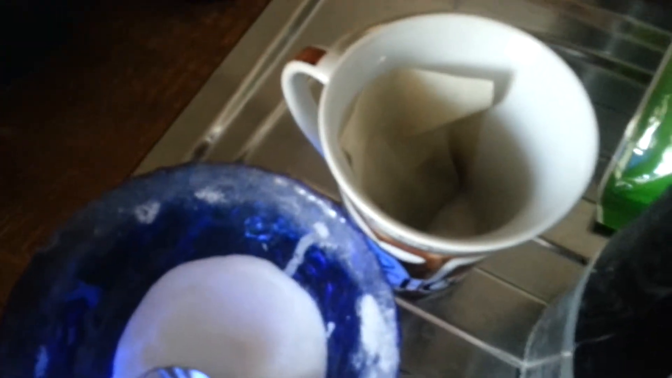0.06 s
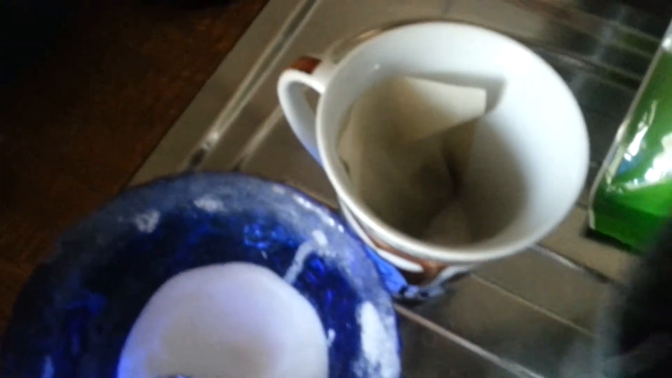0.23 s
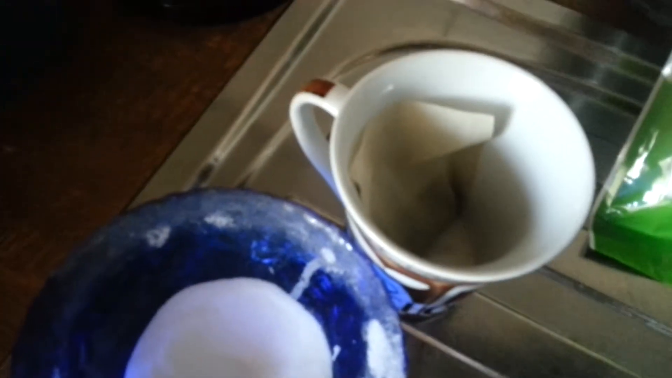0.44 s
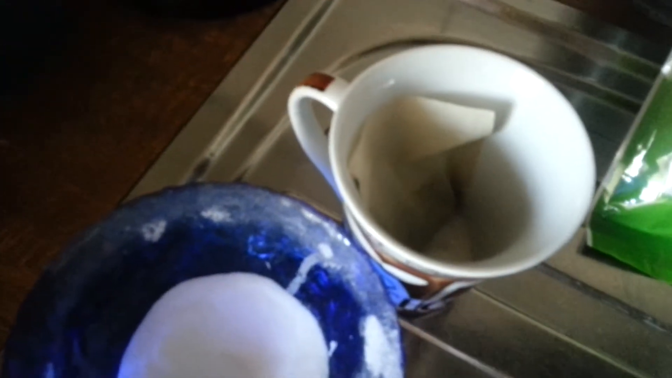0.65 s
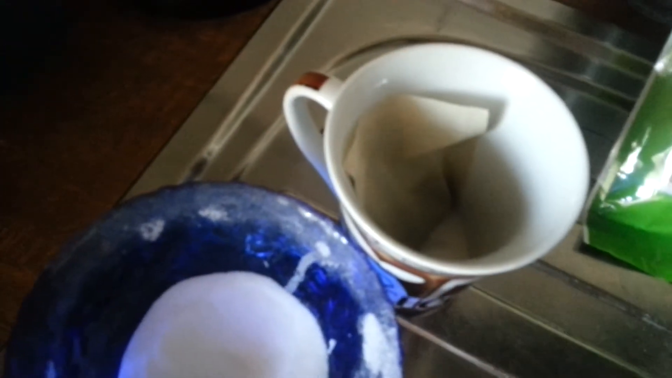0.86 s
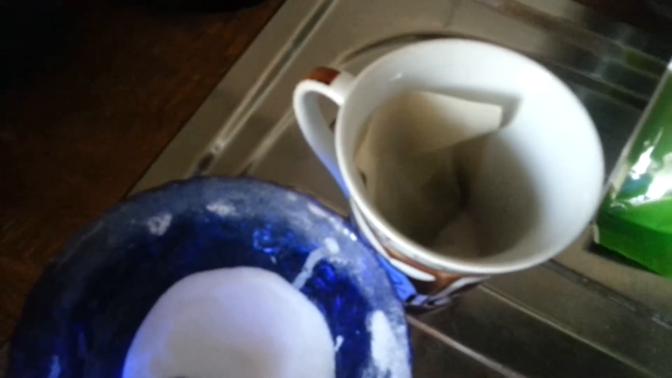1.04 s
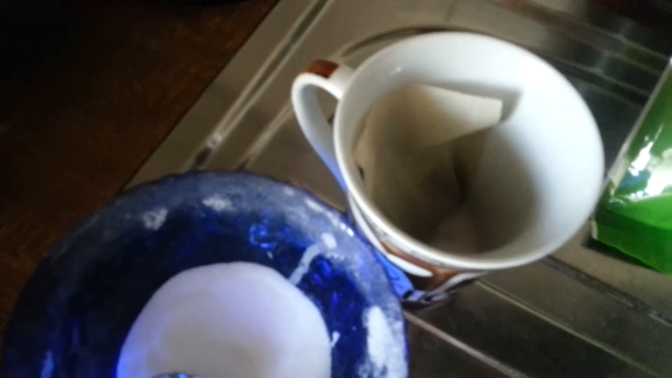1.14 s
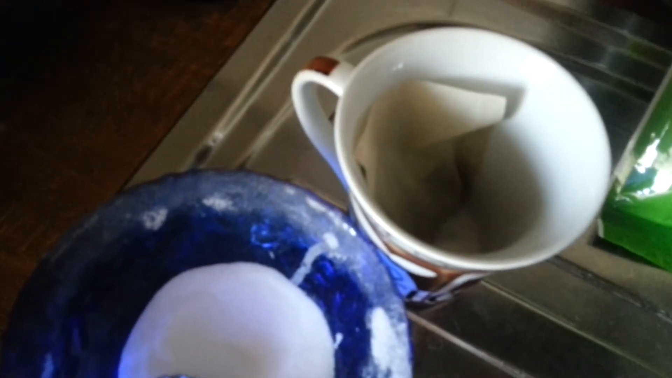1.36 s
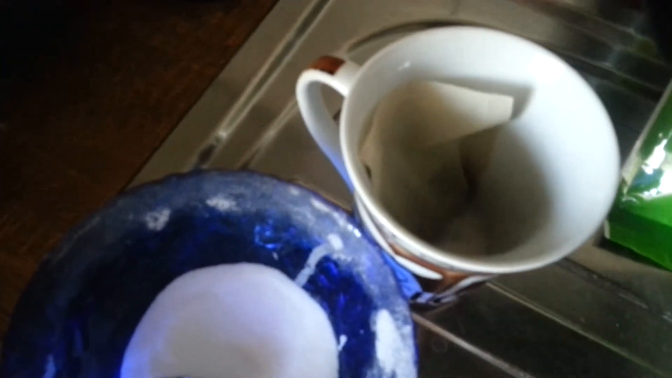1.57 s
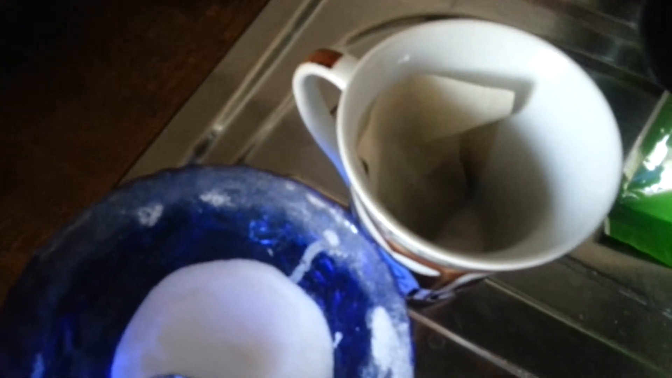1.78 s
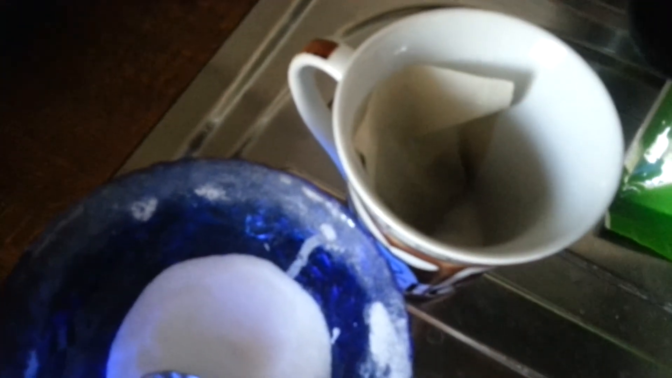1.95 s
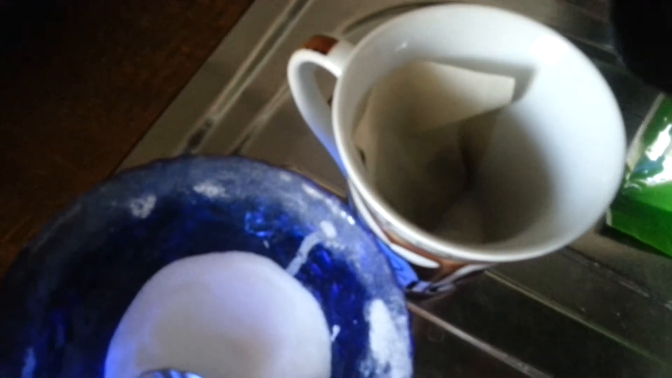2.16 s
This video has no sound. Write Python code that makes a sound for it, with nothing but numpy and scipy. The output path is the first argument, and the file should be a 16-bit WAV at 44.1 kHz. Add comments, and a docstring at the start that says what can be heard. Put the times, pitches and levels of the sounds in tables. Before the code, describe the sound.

Light plastic ticks and rubbing, then a loud hollow knock as a hot kettle lands on its base, a small after-knock, and muffled bubbling dying away; heard close in a small, quiet kitchen.

```python
"""A hollow clunk and a plastic scrape, over a rush of water that thins out to single dull pops.
An electric kettle, just off the boil, is set down: knocks ring damped body modes and crack as noise,
the scrape and the rush are coloured random clicks, and collapsing steam pops as short rings and noise.
A small kitchen and faint hiss surround it, heard from close by with a pair of microphones."""
import sys
import numpy as np
from scipy import signal
from scipy.fft import rfft, irfft
from scipy.io import wavfile

SR = 44100
rng = np.random.default_rng(int(sys.argv[2]) if len(sys.argv) > 2 else 0)


def master(y):
    """Save y as 16-bit WAV."""
    cut = np.clip(np.atleast_2d(y).T, -1, 1)
    pcm = np.round(cut * 32767)  # scale
    wavfile.write(sys.argv[1], SR, pcm.astype(np.int16))


N = 97020

# delay at the right microphone: longer for rush and pops, shorter for cracks, scrapes and singing
LONG_LAG_S, SHORT_LAG_S = 0.000377, 0.00021
WATER_PAN_DB = -3  # rush and pops


def undb(db):
    """Decibels to gain."""
    return 10 ** (np.asarray(db) / 20)


def unit(x):
    """Scale to rms 1."""
    return x / np.sqrt(np.mean(x ** 2))


def clock():
    """Time of every sample [s]."""
    return np.arange(N) / SR


def noise():
    """Two independent streams of white noise."""
    return rng.standard_normal((2, N))


def curve(rows):
    """Gain along (time [s], level [dB]) points."""
    return undb(np.interp(clock(), *np.array(rows).T))


def fade(start_s, life_s):
    """Sudden onset with an exponential decay."""
    age_s = clock() - start_s
    return (age_s >= 0) * np.exp(-np.abs(age_s) / life_s)


def ring(hz, life_s, start_s=0):
    """A damped sine."""
    return fade(start_s, life_s) * np.sin(2 * np.pi * hz * (clock() - start_s))


def convolve(x, response):
    """Pass a sound through an impulse response."""
    return signal.fftconvolve(np.atleast_2d(x), np.atleast_2d(response), axes=1)[:, :N]


def colour(x, points, size=4096):
    """Minimum-phase filter of unit power through (frequency [Hz], level [dB]) points."""
    hz, db = np.array(points).T
    grid_hz = np.maximum(np.arange(size // 2 + 1) * SR / size, 1)
    gain = undb(np.interp(np.log(grid_hz), np.log(hz), db))
    # folding the cepstrum forward makes the filter causal
    cepstrum = irfft(np.log(gain))
    cepstrum[1:size // 2] *= 2
    cepstrum[size // 2 + 1:] = 0
    response = irfft(np.exp(rfft(cepstrum)))
    return convolve(x, response / np.linalg.norm(response))


def clicks(per_s, spread_db):
    """Two streams of random clicks of uneven size, with mean power near 1."""
    chance = np.clip(per_s / SR, 1e-6, 1)
    excess = np.minimum(rng.exponential(size=(2, N)), np.pi)
    size = unit(undb(spread_db * excess))
    happens = rng.random((2, N)) < chance
    sign = rng.choice([-1, 1], (2, N))
    return happens * sign * size / np.sqrt(chance)


def pan(db):
    """Left and right gains for a level difference; positive is louder on the left."""
    return undb(np.array([[.5], [-.5]]) * db)


def place(x, pan_db, lag_s):
    """The sound reaches the left microphone first; towards the treble the two hear less alike."""
    likeness, spread_hz = 0.56, 300  # likeness the treble tends to
    hz = np.arange(N // 2 + 1) * SR / N
    shared = 1 - (1 - likeness) * hz ** 2 / (hz ** 2 + spread_hz ** 2)
    common = shared * rfft(x[0]) * np.exp(-2j * np.pi * hz * lag_s)
    separate = np.sqrt(1 - shared ** 2) * rfft(x[1])
    return np.array([x[0], irfft(common + separate, N)]) * pan(pan_db)


def place_tone(x, pan_db, lag_s):
    """The same tone at both microphones, later at the right one."""
    right = np.interp(clock() - lag_s, clock(), x)
    return np.array([x, right]) * pan(pan_db)


def low_cut(x):
    """The small kettle radiates almost no deep bass."""
    return signal.sosfilt(signal.butter(4, 148, "high", fs=SR, output="sos"), x)


def background():
    """Steady room noise, and a fine hiss that swells briefly and then sinks as the water settles."""
    # colour of the room noise (frequency [Hz], level [dB per Hz])
    floor_colour = [(18, -32), (30, -8), (87, 1.5), (165, -1.5), (722, -6.5), (1010, -11), (1120, -5.5),
                    (1310, -6), (1930, -10.5), (4770, -14), (6180, -20), (11200, -16), (14500, -18.5)]
    # treble hiss (time [s], level [dB])
    hiss_level = [(0, -61), (.3, -57.5), (.7, -59.5), (1.0, -61), (1.4, -65.5), (2.2, -68.5)]
    # its colour (frequency [Hz], level [dB per Hz])
    hiss_colour = [(1000, -15), (4000, -7), (7500, -0.5), (14000, -2)]
    floor_db, floor_pan_db = -58, -2
    room = colour(noise(), floor_colour) * undb(floor_db) * pan(floor_pan_db)
    return room + curve(hiss_level) * colour(noise(), hiss_colour)


def boil():
    """Collapsing steam bubbles, rarer and softer as the boil weakens, and resonances singing as noise bands."""
    # strength of the boil (time [s], level [dB])
    boil_level = [(0, -51), (.3, -45.5), (.41, -46), (.47, -47.5), (.55, -52), (.58, -46), (.71, -48.5),
                  (.76, -52), (.92, -52.5), (1.05, -55.5), (1.3, -63), (1.47, -55.5), (1.6, -66.5),
                  (1.82, -67.5), (1.92, -56.5), (2.0, -71), (2.08, -60), (2.2, -74)]
    # bubbles heard through the kettle wall (frequency [Hz], level [dB])
    wall_colour = [(50, -46), (100, -29), (170, -5), (350, 5.5), (520, -6), (760, 9), (1150, 7.5),
                   (1450, 4.5), (1670, 8.5), (2000, -4), (2650, -1), (3400, -5.5), (4200, 0.5),
                   (5500, -26.5), (14000, -37.5)]
    # singing resonances (frequency [Hz], width [Hz], level at start [dB], start [s], end [s])
    singing = [(910.3, 32, -45.5, 0.33, 0.733), (860, 90, -62, 0.42, 0.51), (1010, 58, -50.5, 0.41, 0.48),
               (368, 21, -53.5, 0.2, 0.69), (4170, 210, -61, 0.677, 0.696), (184.4, 19, -63, .55, 1.17),
               (764, 120, -58.5, 0.907, 1.03)]
    peak_bubbles_per_s, spread_db, rate_db_per_decade, rush_db = 2900, 1.5, 25.5, -2
    sing_fade_s, sing_sag_db_per_s, sing_pan_db = 0.023, -21.5, 2.5

    t, strength = clock(), curve(boil_level)
    per_s = peak_bubbles_per_s * (strength / strength.max()) ** (20 / rate_db_per_decade)
    rush = colour(undb(rush_db) * strength * clicks(per_s, spread_db), wall_colour)
    song = 0
    for hz, width_hz, db, start_s, end_s in singing:
        outside_s = np.maximum(np.maximum(start_s - t, t - end_s), 0)
        level = undb(db + sing_sag_db_per_s * (t - start_s))
        swell = np.exp(-outside_s / sing_fade_s) * level
        tone = convolve(rng.standard_normal(N), ring(hz, 1 / (np.pi * width_hz)))[0]
        song = song + swell * unit(tone)
    return place(rush, WATER_PAN_DB, LONG_LAG_S) + place_tone(song, sing_pan_db, SHORT_LAG_S)


def sliding():
    """The foot sticks and slips over the base: a low rub and swelling scrapes, both of random clicks."""
    # low rub of the foot (time [s], level [dB])
    rub_level = [(0, -42), (.05, -44), (.08, -48), (.105, -44), (.117, -38), (.135, -53), (.165, -36.5),
                 (.245, -38.5), (.29, -53), (.34, -64), (.45, -74.5)]
    # its colour (frequency [Hz], level [dB])
    rub_colour = [(50, -54), (150, -42), (195, -1), (230, -3), (350, 5), (520, -7.5), (680, -7.5),
                  (930, -5), (1300, -25), (4000, -34.5)]
    # scrapes (peak time [s], level [dB], rise [s], fall [s])
    scrapes = [(0.016, -37, 0.015, 0.017), (0.167, -51, 0.045, 0.046), (0.224, -45, 0.042, 0.027),
               (0.292, -30.5, 0.027, 0.018), (.365, -53, 0.0074, 0.023)]
    # scraping plastic (frequency [Hz], level [dB])
    scrape_colour = [(50, -69), (130, -8.5), (350, -1.5), (700, 0.5), (1150, 0.5), (1550, 8.5), (2100, 4),
                     (3000, -0.5), (4500, -9.5), (6200, -18.5), (14000, -26)]

    t, force = clock(), 0
    for peak_s, db, rise_s, fall_s in scrapes:
        force = force + undb(db) * np.exp(-np.maximum((peak_s - t) / rise_s, (t - peak_s) / fall_s))
    scrape = colour(force * clicks(per_s=1600, spread_db=2.5), scrape_colour)
    rub = colour(curve(rub_level) * clicks(per_s=1500, spread_db=0), rub_colour)
    return place(scrape, -4.5, SHORT_LAG_S) + place(rub, 3.5, SHORT_LAG_S)


def set_down():
    """Each knock rings the damped modes of the kettle's body and gives a short plastic crack."""
    # knocks of the kettle on its base (time [s], body level [dB], crack level [dB])
    knocks = [(0.0105, -69, -54), (0.0236, -57.5, -51), (0.0477, -50.5, -39), (0.09, -66, -39),
              (.111, -46, -36.5), (0.17, -64.5, -32.5), (.175, -20, -29), (.1793, -22.5, -15.5),
              (0.1823, -22, -25.5), (.188, -27, -21), (.1966, -35, -26), (0.2145, -54, -19),
              (0.287, -38, -29), (0.2954, -47, -28)]
    # modes of the filled kettle on its base (frequency [Hz], level [dB], t60 [s])
    body_modes = [(133.4, -24.5, 0.47), (236.4, -21.5, 0.19), (377, -49, .2), (448.3, -7.5, .12),
                  (545, -10, 0.11), (697, 3, 0.075), (757, -19, 0.044), (902, -11.5, 0.077),
                  (1140, -18, 0.24), (1360, -24, 0.15), (1370, -15, 0.1), (1574, -10, 0.3),
                  (1730, -30, .14), (1923, -18, 0.24), (2610, -32, .14)]
    # contact crack (frequency [Hz], level [dB])
    crack_colour = [(50, -105), (110, -46), (250, -13), (600, 8.5), (1000, -0.5), (1600, 4.5), (2700, -1),
                    (3600, -9), (5000, -23), (6200, -28), (14000, -45)]
    crack_s, contact_s = 0.006, 0.0001  # decay constants
    body_pan_db_per_octave, crack_pan_db = -1, -3.5

    push = sum(undb(db) * fade(s, contact_s) for s, db, _ in knocks) / (contact_s * SR)
    response = 0
    for hz, db, t60_s in body_modes:
        octaves = max(np.log2(hz / 350), 0)  # the bass stays central
        gains = undb(db) * pan(body_pan_db_per_octave * octaves)
        response = response + gains * ring(hz, t60_s / np.log(1000))
    body = low_cut(convolve(push, response))
    contact = sum(undb(db) * fade(s, crack_s) for s, _, db in knocks)
    crack = colour(contact * noise(), crack_colour)
    return body + place(crack, crack_pan_db, SHORT_LAG_S)


def pops():
    """A large bubble rings for a few cycles and shakes the kettle wall, heard as a noise burst."""
    # single steam pops (time [s], relative level [dB], pitch [Hz])
    steam_pops = [(.443, -37, 920), (.456, -31.5, 413), (.497, -36, 1760), (.53, -38.5, 2390),
                  (.537, -40, 908), (0.5606, -33, 900), (.569, -39, 2170), (.579, -38.5, 820),
                  (.718, -36.5, 1640), (.804, -45.5, 2580), (.833, -42, 1700), (.865, -45, 820),
                  (.883, -49, 1610), (.899, -40.5, 790), (.909, -55, 726), (.937, -39.5, 1500),
                  (.975, -55, 750), (.995, -44.5, 790), (1.003, -50, 745), (1.017, -46.5, 674),
                  (1.064, -44.5, 885), (1.083, -44, 1760), (1.085, -40.5, 780), (1.154, -44, 1350),
                  (1.186, -44, 2520), (1.237, -47.5, 1220), (1.355, -43.5, 1660), (1.4204, -42, 1670),
                  (1.434, -44.5, 715), (1.453, -40, 1100), (1.616, -55.5, 980), (1.712, -53, 1520),
                  (1.737, -45, 1700), (1.851, -42, 1070), (2.028, -44.5, 2180), (2.03, -56, 1490)]
    # the shaken wall (frequency [Hz], level [dB])
    pop_colour = [(100, -24), (330, 1), (520, -2), (760, 5.5), (1250, 2), (1670, 5.5), (2100, -3.5),
                  (2700, -10), (3400, -14.5), (5500, -23), (14000, -33)]
    shake_s, ring_s, attack_s, ring_db = 0.0048, 0.001, 0.00031, 6

    tone, shake = 0, 0
    for s, db, hz in steam_pops:
        # subtracting a faster decay softens the onset
        tone = tone + undb(db) * (ring(hz, ring_s, s) - ring(hz, attack_s, s))
        shake = shake + undb(db) * (fade(s, shake_s) - fade(s, attack_s))
    splash = place(colour(shake * noise(), pop_colour), WATER_PAN_DB, LONG_LAG_S)
    return undb(ring_db) * place_tone(tone, WATER_PAN_DB, LONG_LAG_S) + splash


def kitchen(x, wet_db):
    """A short dull tail from the kitchen's walls: decaying band-limited noise."""
    t60_s, band_hz = 0.6, [200, 5400]
    tail = noise() * fade(0.003, t60_s / np.log(1000))
    band = signal.butter(1, band_hz, "band", fs=SR, output="sos")
    response = signal.sosfilt(band, tail / np.linalg.norm(tail[0]))
    return x + undb(wet_db) * convolve(x, response)


def scene():
    """Kettle and water in the kitchen."""
    water = kitchen(low_cut(boil() + pops()), wet_db=-8.5)
    kettle = kitchen(sliding() + set_down(), wet_db=-9.5)
    return background() + water + kettle


def record(dry):
    """The recorder cuts the top."""
    return signal.sosfilt(signal.ellip(12, .2, 80, 14600, fs=SR, output="sos"), dry)


dry = scene()
out = record(dry)
master(out)
```